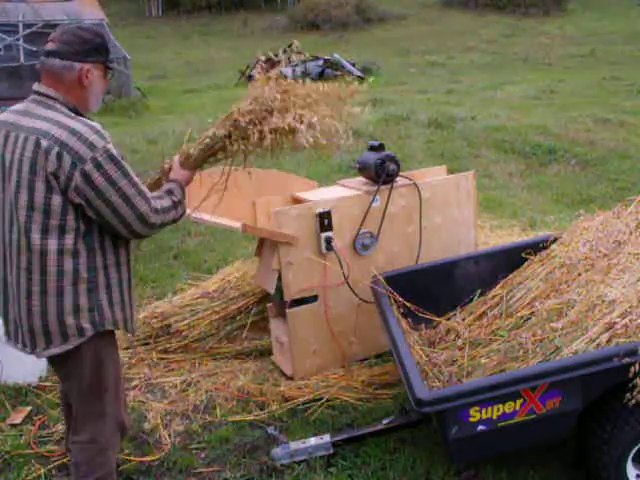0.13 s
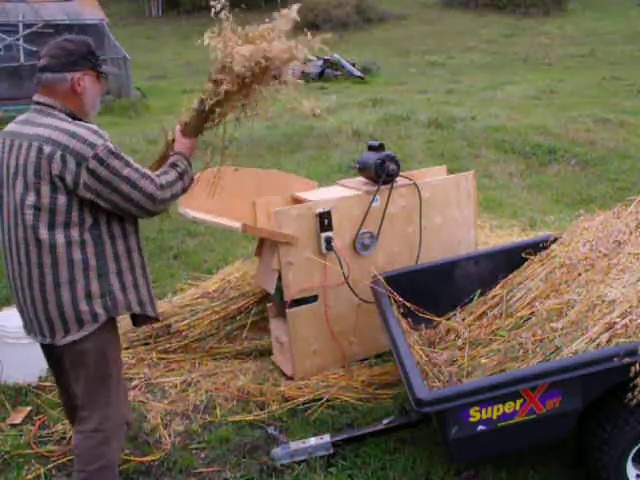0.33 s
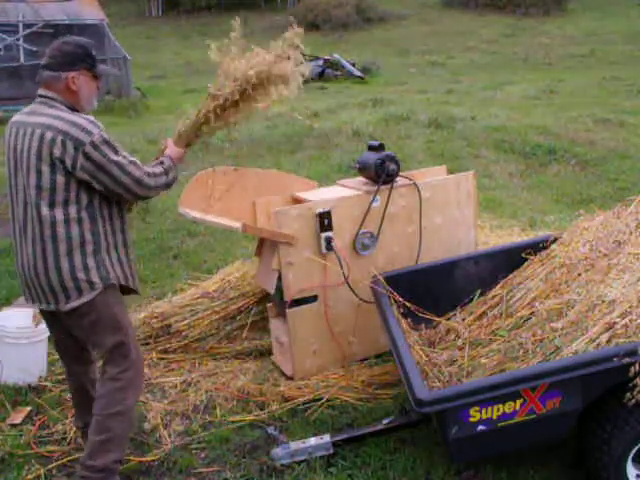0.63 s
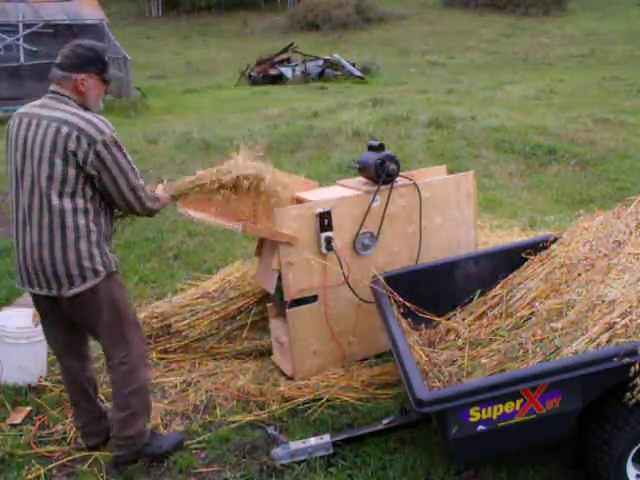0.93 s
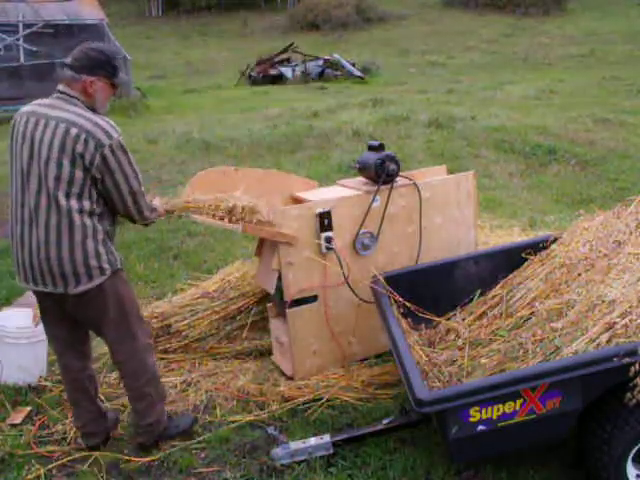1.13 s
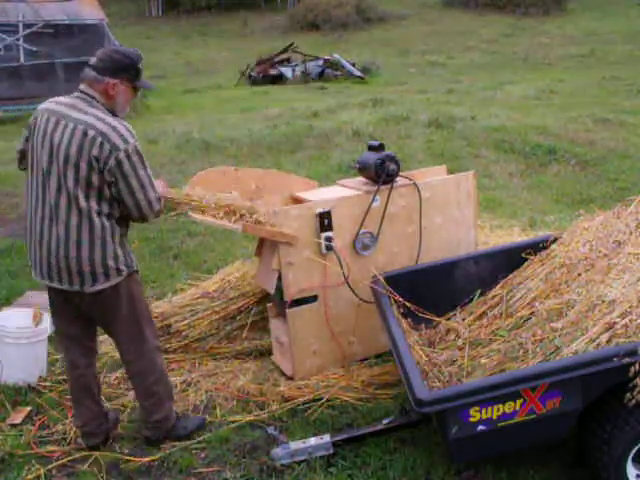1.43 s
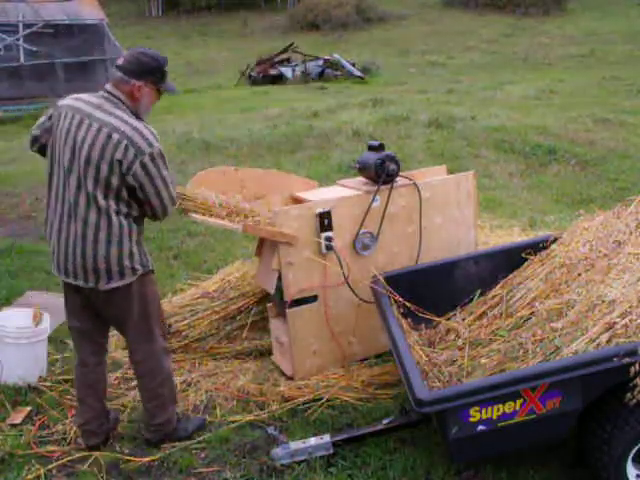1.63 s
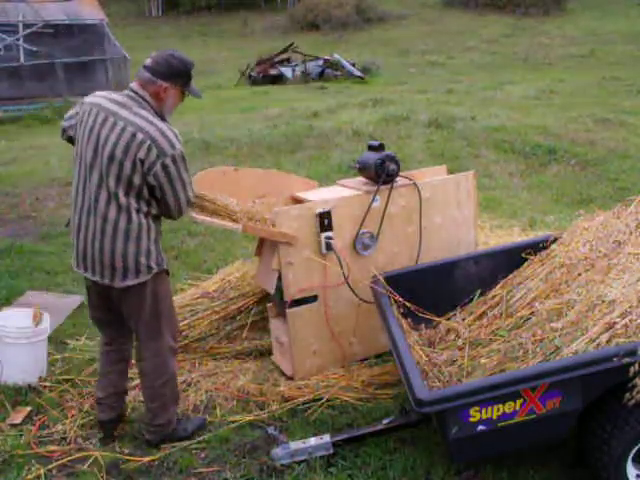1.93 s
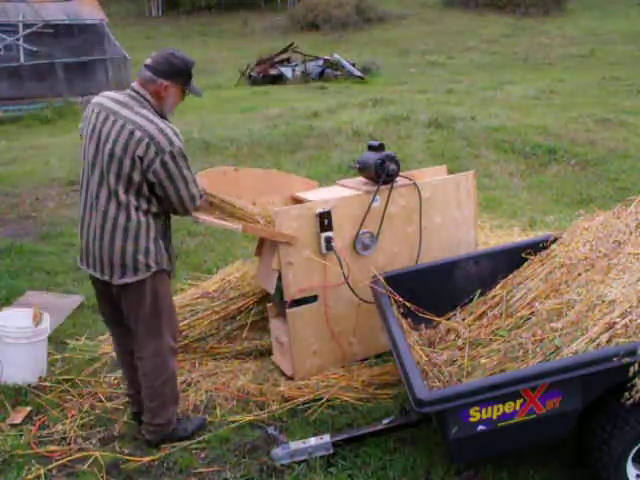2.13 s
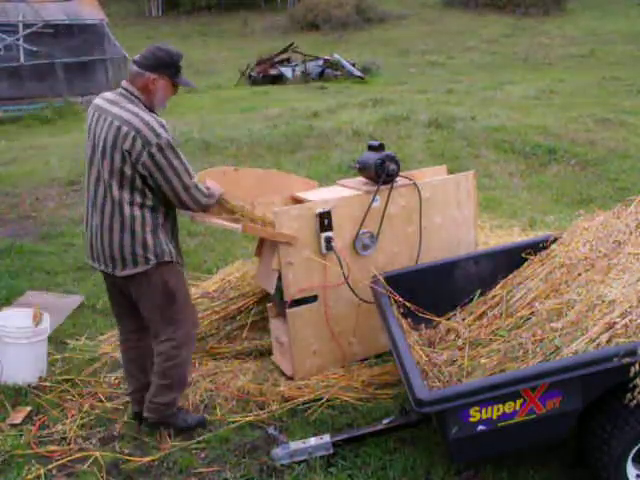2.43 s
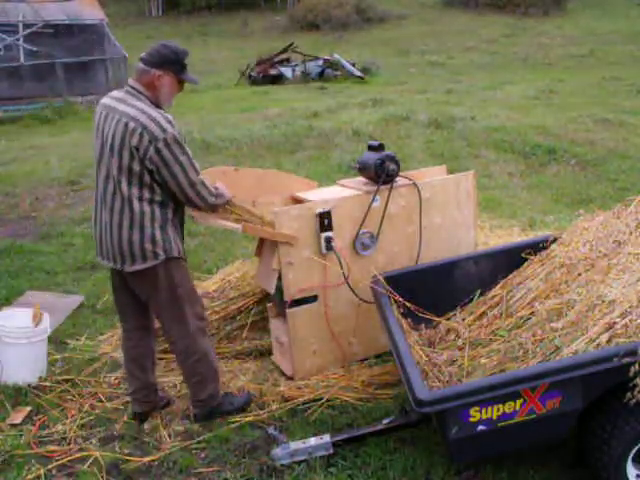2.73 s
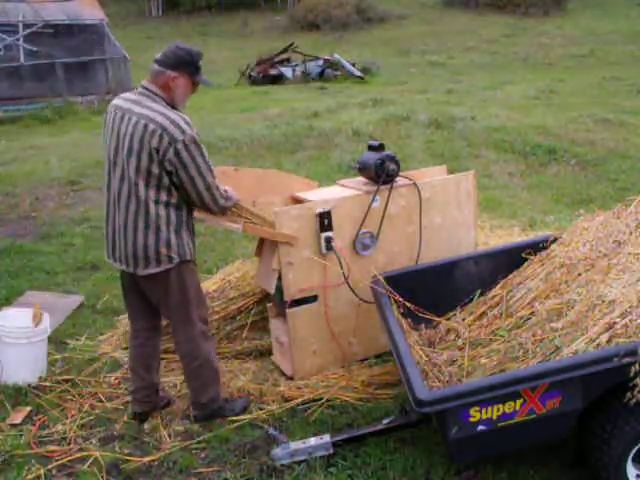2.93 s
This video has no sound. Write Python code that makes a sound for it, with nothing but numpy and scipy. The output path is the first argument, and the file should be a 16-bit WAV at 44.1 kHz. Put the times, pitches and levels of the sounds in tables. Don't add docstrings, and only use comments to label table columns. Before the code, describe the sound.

A small electric thresher runs throughout, its low motor hum and airy roar beneath fast throbbing rattle, irregular hollow plywood knocks and brief crisp stalk swishes. Soft low wind bumps come mostly in the first half second. From about 2.2 seconds a bundle bites; straw crackle thickens, the frame shudders and deep thuds join, reaching a full roar near 2.9-3.1 seconds, treble dulled and the hardest blows clipping.

```python
import sys
import numpy as np
from scipy import signal
from scipy.fft import rfft, irfft
from scipy.io import wavfile

SR = 44100
rng = np.random.default_rng(int(sys.argv[2]) if len(sys.argv) > 2 else 0)


def to_linear_factor(level_db):
    exponent = np.asarray(level_db, float) / 20
    return 10 ** exponent


def waveform_to_disk(signal):
    frames = np.transpose(np.atleast_2d(signal))
    scaled = np.clip(frames, -1, 1) * 32767
    samples = np.round(scaled).astype(np.int16)
    wavfile.write(sys.argv[1], SR, samples)


N = 136710
T = np.arange(N) / SR


def evened(x):
    return x / np.sqrt(np.mean(x ** 2) + 1e-20)


def curve(points):
    return np.interp(T, *np.transpose(points))


def coloured(x, points):
    hz, db = np.transpose(points)
    f = np.fft.rfftfreq(N, 1 / SR)
    gain = to_linear_factor(np.interp(np.log(f + 1), np.log(hz), db))
    return evened(irfft(rfft(x) * gain, N))


def drift(top_hz):
    f = np.fft.rfftfreq(N, 1 / SR)
    spectrum = rfft(rng.standard_normal(N))
    return evened(irfft(spectrum / (1 + (f / top_hz) ** 4), N))


def clicks(per_s, spread_db):
    size = to_linear_factor(spread_db * np.minimum(rng.exponential(1, N), 4))
    sign = rng.choice([-1., 1.], N)
    return evened(size * sign * (rng.random(N) < per_s / SR))


# time in seconds, level in dB.
WIND_LEVEL = [(0, -41.5), (.07, -28), (.14, -38.5), (.27, -27.5), (.38, -25.5), (.46, -44.5), (.9, -50),
              (.98, -41.5), (1.06, -49), (1.5, -44), (1.59, -37), (1.7, -47), (2.45, -49), (2.57, -39.5),
              (2.7, -43), (2.92, -38.5), (3.1, -32)]
# frequency in Hz, density in dB per Hz.
WIND_COLOUR = [(15, -5), (35, -1.5), (55, -6.5), (100, -1), (170, -17.5), (400, -46.5)]


def wind():
    lumps_db = 2.0 * drift(9.7)
    return coloured(rng.standard_normal(N), WIND_COLOUR) * to_linear_factor(curve(WIND_LEVEL) + lumps_db)


# frequency in Hz, level in dB.
HUM_TONES = [(65, -51), (109, -48), (120, -42), (131, -44.5)]
# frequency in Hz, density in dB per Hz.
ROAR_COLOUR = [(20, -32), (50, -36.5), (110, -12.5), (170, -32), (300, -10), (450, 1.5), (1000, -16),
               (5500, -20)]
# frequency in Hz, density in dB per Hz.
SHUDDER_COLOUR = [(50, -19.5), (85, -1.5), (130, -1), (200, -9.5), (300, -3), (450, -22.5)]


def motor(load_db):
    hum = np.zeros(N)
    for hz, db in HUM_TONES:
        level = np.sqrt(2) * to_linear_factor(db + 0.77 * drift(7.6))
        hum += level * np.sin(2 * np.pi * hz * T + 1.2 * drift(1.4))
    roar_db = -30 + 0.43 * load_db + 1.74 * drift(5.1)
    roar = coloured(rng.standard_normal(N), ROAR_COLOUR) * to_linear_factor(roar_db)
    shudder = coloured(rng.standard_normal(N), SHUDDER_COLOUR) * to_linear_factor(-51 + 1.052 * load_db)
    return hum * to_linear_factor(0.1 * load_db) + roar + shudder


# start in seconds, peak in dB, centre frequency in Hz.
STALK_SWISHES = [(0.161, -13, 3320), (0.2768, -13, 3220), (0.3198, -13, 3520), (0.452, -13.5, 3460),
                 (0.5015, -13.5, 3470), (0.616, -24, 3230), (0.7113, -36, 2080), (0.806, -15, 2510),
                 (0.8604, -10.5, 4660), (0.9125, -11, 3240), (0.9874, -15, 3400), (1.07, -18, 2030),
                 (1.1498, -8, 4950), (1.19, -19, 2100), (1.256, -14, 2770), (1.4885, -9, 1920),
                 (1.646, -26, 2050), (1.6983, -20, 2030), (1.7553, -26.5, 4300), (1.8482, -18, 1880),
                 (1.9613, -13, 4830), (2.0363, -17, 3630), (2.2214, -12, 2030), (2.2698, -7.5, 4470),
                 (2.3146, -8, 1870), (2.4877, -27, 2290), (2.5417, -4.5, 4600), (2.611, -6, 3180),
                 (2.6658, -4, 1840)]


def swishes():
    rise_s, t60_s, width_hz, trim_db = 0.0011, .09, 1300, -11
    out, t = np.zeros(N + SR), np.arange(6000) / SR
    shape = np.minimum(t / rise_s, 1) * to_linear_factor(-60 * t / t60_s)
    for start, db, hz in STALK_SWISHES:
        crackle = rng.standard_normal(len(t)) * to_linear_factor(1.4 * rng.standard_normal(len(t)))
        band = signal.lfilter(*signal.iirpeak(hz, hz / width_hz, SR), crackle)
        bright = np.diff(crackle, prepend=0)
        puff = (evened(band) + 0.5 * evened(bright)) * shape
        out[round(start * SR):][:len(t)] += puff * to_linear_factor(db + trim_db)
    return out[:N]


def beat():
    turn = 2 * np.pi * 10.9 * T
    paddles_db = 1.0 * (np.cos(turn + 1.21) + 1.8 * np.cos(2 * turn + 1.6))
    return paddles_db + 0.76 * np.cos(turn / 3 + 1.2)


IDLE_DB = -34.5
# time in seconds, thrashing level in dB.
STRAW_LOAD = [
    (0, -29.5),
    (.5, -30),
    (1.4, -29),
    (2.18, -29),
    (2.35, -22),
    (2.5, -14),
    (2.62, -13.5),
    (2.8, -10),
    (2.97, -8),
    (3.1, -8.5),
]
# frequency in Hz, density in dB per Hz.
STRAW_COLOUR = [(300, -42.5), (800, -11.5), (1300, -0.5), (2000, 1), (3000, 1.5), (4000, 1), (5200, 4.5),
                (7000, -4.5)]


def straw():
    grain_share = 0.76
    mix = grain_share * clicks(5000, 2.75) + (1 - grain_share) * rng.standard_normal(N)
    level_db = curve(STRAW_LOAD)
    lumpiness = np.clip(2 - .045 * (level_db - IDLE_DB), .2, 1)
    clumps_db = .8 * beat() + 2.6 * drift(44) + 0.68 * drift(130)
    return coloured(mix, STRAW_COLOUR) * to_linear_factor(lumpiness * clumps_db) * to_linear_factor(level_db - 3.5)


# frequency in Hz, width in Hz, level in dB.
BOX_MODES = [(281, 17, -29), (336, 12, -4.5), (409, 21, -2.5), (449, 40, 6), (556, 73, 0), (705.7, 81, 4.5),
             (793.4, 77, 0.5), (950.5, 89, -1.5), (1033, 82, -3.5), (1229, 35, -15.5), (1448, 71, -7.5),
             (1630, 28, -6.5), (1722, 68, -11), (1924, 70, -12.5)]


def box_ring():
    t = np.arange(4096) / SR
    ring = np.zeros(len(t))
    for hz, width_hz, db in BOX_MODES:
        decay = np.exp(-np.pi * width_hz * t)
        ring += to_linear_factor(db) * np.sqrt(width_hz) * decay * np.sin(2 * np.pi * hz * t)
    low_cut = signal.butter(4, 248.4, "high", fs=SR, output="sos")
    ring = signal.sosfilt(low_cut, ring)
    return ring / abs(ring).max()


def thud():
    hz, width_hz, rise_s = 282, 98, .004
    t = np.arange(4096) / SR
    tone = np.exp(-np.pi * width_hz * t) * np.sin(2 * np.pi * hz * t)
    return to_linear_factor(-3) * tone * np.minimum(t / rise_s, 1)


# start in seconds, peak in dB.
BOX_KNOCKS = [(0.071, -11), (0.245, -19.5), (0.271, -7.5), (0.409, -12), (0.448, -13), (0.54, -9),
              (0.568, -9.5), (0.625, -16), (0.719, -15.5), (0.861, -11.5), (0.92, -12), (0.97, -15),
              (1.042, -9), (1.127, -11), (1.316, -5.5), (1.408, -10), (1.452, -14.5), (1.529, -9.5),
              (1.549, -11), (1.589, -8), (1.68, -11), (1.801, -12), (1.843, -9.5), (1.958, -11.5),
              (2.073, -7), (2.166, -11), (2.207, -17.5), (2.258, -10), (2.309, -6.5), (2.348, -7)]
# start in seconds, peak in dB.
LOADED_BLOWS = [(2.439, -4.5), (2.538, -6.5), (2.636, -5), (2.699, -8.5), (2.731, -5), (2.749, -5),
                (2.815, -6.5), (2.862, -19), (2.91, 2), (2.926, -14.5), (2.956, -1), (2.972, -2.5),
                (3.001, -1.5), (3.012, -9.5), (3.049, -1.5), (3.083, -7.5)]


def drum(load_db):
    contact_s, bounce_s, bounces = .002, .02, 8
    ring = box_ring()
    shake = clicks(1200, 1.89) * to_linear_factor(beat() + 1.0 * drift(32))
    rattle = evened(signal.oaconvolve(shake, ring)[:N]) * to_linear_factor(-24.5 + 0.21 * load_db)

    blows = np.zeros(N + SR)
    for start, db in [*BOX_KNOCKS, *LOADED_BLOWS]:
        peak_db = db - 2.5
        blows[round((start + contact_s) * SR)] += to_linear_factor(peak_db)
        late = rng.random(bounces)
        push = 2 * (2 * rng.random(bounces) - 1)
        at = np.round((start + 2 * contact_s + bounce_s * late) * SR).astype(int)
        blows[at] += to_linear_factor(peak_db - 6 - 6 * late) * push

    loaded = blows[:N] * (T > LOADED_BLOWS[0][0] - .01)
    knocks = signal.oaconvolve(blows, ring)[:N]
    return rattle + knocks + signal.oaconvolve(loaded, thud())[:N]


def scene():
    load_db = curve(STRAW_LOAD) - IDLE_DB
    return (wind() + motor(load_db) + swishes() + straw() + drum(load_db))[None]


def band_limit(x):
    return signal.sosfilt(signal.butter(12, 15800, fs=SR, output="sos"), x)


def record(dry):
    soft, edge_hz, edge_width_hz, clip = 1.05, 5398, 2170, .7
    limited = soft * np.tanh(dry / soft)
    f = np.fft.rfftfreq(2 * N, 1 / SR)
    slope = np.clip((edge_hz - f) / edge_width_hz + .5, 0, 1)
    treble_cut = np.sin(np.pi / 2 * slope) ** 2.42
    dull = irfft(rfft(limited, 2 * N) * treble_cut, 2 * N)[:, :N]
    return band_limit(np.clip(dull - .0028, -clip, clip))


dry = scene()
out = record(dry)
waveform_to_disk(out)
```